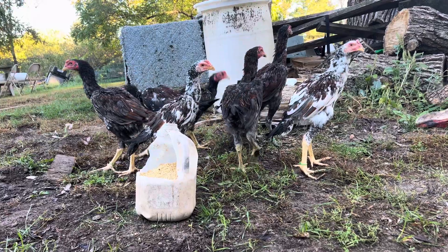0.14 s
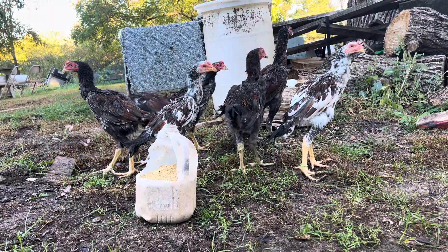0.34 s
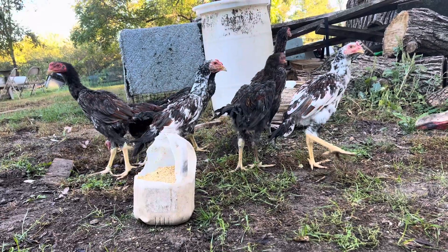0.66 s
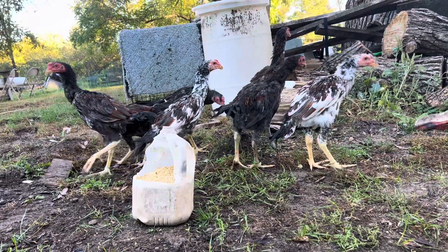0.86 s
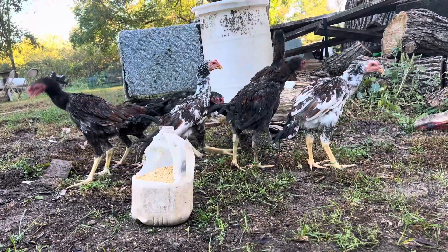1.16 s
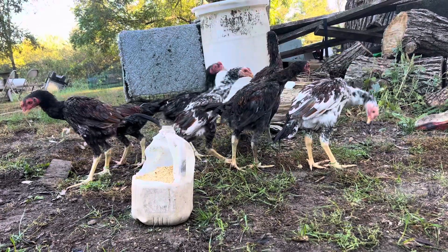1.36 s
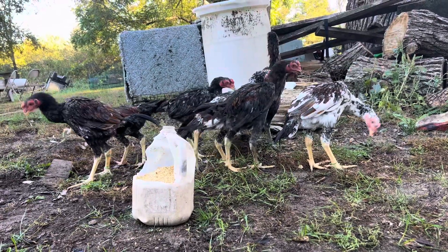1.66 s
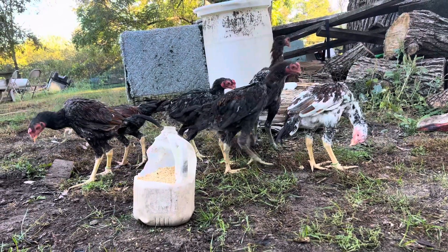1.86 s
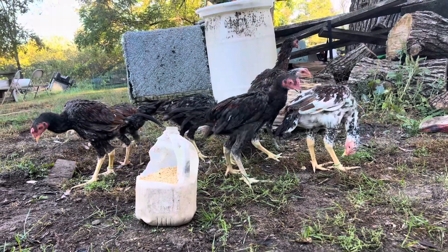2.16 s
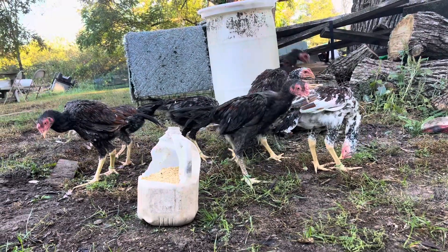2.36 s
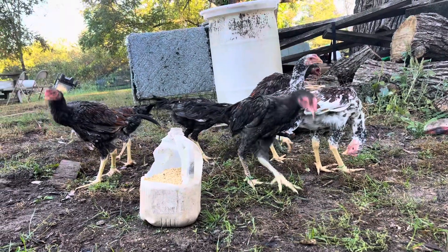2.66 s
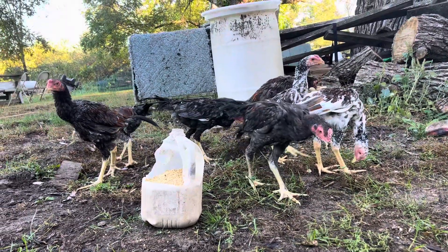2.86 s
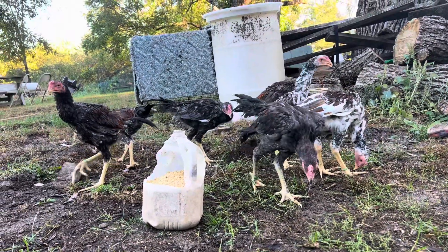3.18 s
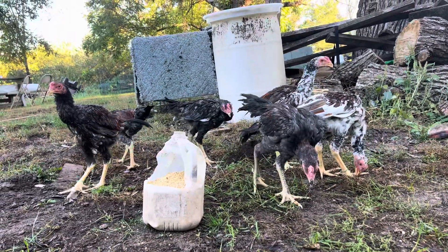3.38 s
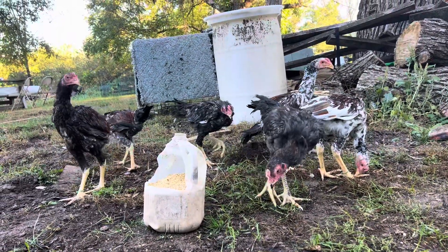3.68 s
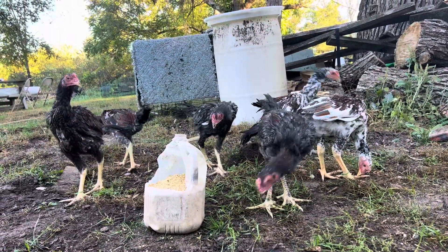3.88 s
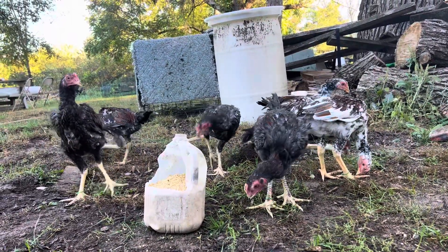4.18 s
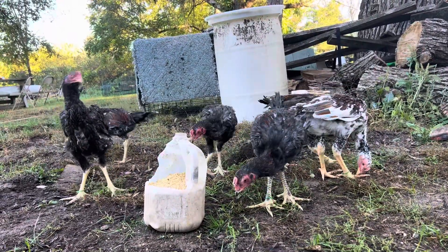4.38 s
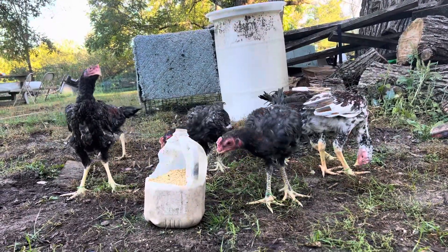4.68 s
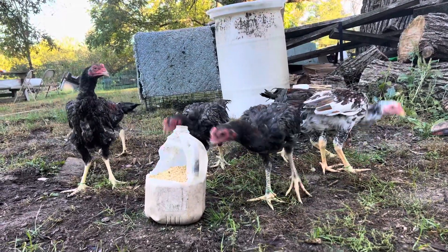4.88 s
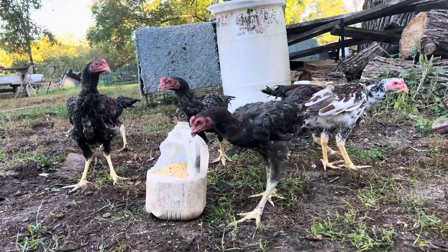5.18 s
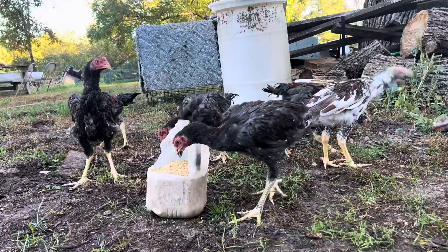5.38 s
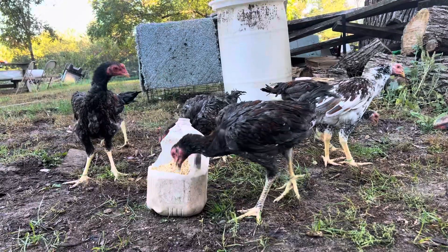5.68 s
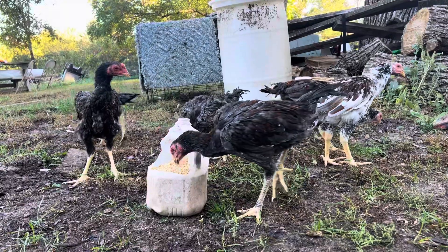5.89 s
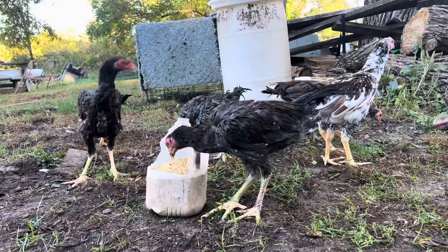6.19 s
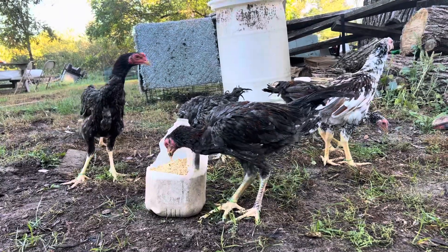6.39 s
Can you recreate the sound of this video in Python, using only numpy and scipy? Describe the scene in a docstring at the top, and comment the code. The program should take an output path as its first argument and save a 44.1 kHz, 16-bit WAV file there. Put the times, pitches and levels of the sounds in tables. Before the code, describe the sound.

Outdoor yard with a low, distant propeller drone and soft rustling air. A few quiet low clucks and a sagging moan come first, then two firmer clucks and a hoarse, cracking two-part crow from the right, by far the loudest sound. Afterwards small yelps, falling peeps, a faint songbird trill and light foot and beak ticks. Stereo microphone close to the birds.

```python
"""A rooster off to the right crows hoarsely: two beating membranes and hissing air drive a windpipe.
Before the crow it clucks twice; chickens cluck, moan and yelp as gliding stacks of partials, and peep as single tones.
Beaks, claws and brushed feathers are filtered noise bursts; a songbird trills in short rising whistles.
A far propeller engine drones past as sinking overtones, over a noise bed of rumble and rustling trees."""
import sys
import numpy as np
from scipy import signal
from scipy.fft import rfft, irfft
from scipy.io import wavfile
from scipy.ndimage import uniform_filter1d

SR = 44100
rng = np.random.default_rng(int(sys.argv[2]) if len(sys.argv) > 2 else 0)


def dump(signal):
    """Clip the signal to [-1, 1] and save it as 16-bit WAV at the path in sys.argv[1]."""
    limited = np.clip(np.atleast_2d(signal).T, -1, 1)
    pcm = np.round(limited * 32767).astype(np.int16)
    wavfile.write(sys.argv[1], SR, pcm)


N = 288414

# A far propeller engine passing over. Each row: time in seconds, turns per second in Hz, level in dB.
ENGINE_PASS = [(0, 33.8, -64.5), (.5, 33.61, -68), (2, 31.28, -56), (3.3, 29.29, -61), (5, 26.58, -63.5),
               (6.54, 24.58, -61)]
# What reaches the yard of its overtones. Each row: frequency in Hz, gain in dB.
DRONE_GAIN = [(55, -1), (90, 2.5), (112, 6), (140, -11), (185, -10.5), (220, -0.5), (300, -16)]
# Upper overtones, heard only at first. Each row: multiple of the turning rate, level in dB.
WHINE_TONES = [(9, -71), (11, -77), (14, -76.5), (18, -76)]
# How near the engine's rumble sounds. Each row: time in seconds, level in dB (only the changes count).
RUMBLE_NEARNESS = [(0, -66), (0.799, -57.5), (2.203, -56), (5.502, -54.5), (6.54, -55.5)]
# Colour of the air. Each row: frequency in Hz, relative level per Hz in dB.
AIR_COLOUR = [(25, -29.5), (65, 9.5), (109, -4), (176, -8), (237, -16.5), (354, -20), (978, -22.5),
              (2020, -36.5), (3260, -36.5), (4380, -48.5), (6200, -43.5), (9020, -49.5), (10300, -79.5),
              (15000, -66)]
# Likeness of the air's two sides. Each row: frequency in Hz, correlation from -1 to 1.
AIR_LIKENESS = [(60, 1), (180, 0.6), (550, -0.17), (1650, -0.36), (4970, -0.21), (15000, 0.45)]
# Balance of the air's two sides. Each row: frequency in Hz, left over right in dB.
AIR_LEAN = [(60, 0), (180, -8), (550, -2), (1650, -1.5), (4970, 4.5), (15000, -14)]
# The songbird's rising notes. Each row: start in seconds, length in seconds,
# top pitch in Hz before WHISTLE_RATIO, level in dB.
TRILL_NOTES = [(0, 0.044, 6870, -67), (0.105, 0.05, 6360, -71), (0.167, 0.027, 6360, -72),
               (3.288, 0.049, 7840, -63.5), (3.379, 0.037, 7270, -62), (3.478, 0.054, 6980, -66.5),
               (3.579, 0.032, 6320, -59.5), (3.673, 0.024, 6124, -56.5), (3.76, 0.037, 6070, -62),
               (3.859, 0.028, 6010, -67), (3.93, 0.024, 5920, -68.5)]
# The songbird's thin high calls. Each row: start in seconds, length in seconds,
# start and end pitch in Hz before WHISTLE_RATIO, level in dB.
HIGH_CALLS = [(2.875, 0.045, 6020, 7900, -73), (5.56, 0.045, 8785, 7390, -71)]
# Beaks and claws on dry ground. Each row: start in seconds, click level in dB, click centre in Hz, thud level in dB.
STEP_TICKS = [(0.894, -68, 5600, -46), (0.981, -55, 5170, -50), (1.088, -72, 5200, -47.5),
              (1.604, -61.5, 6400, -46), (1.653, -65, 11200, -60), (4.2925, -69, 8950, -49),
              (4.5108, -66, 2300, -42), (4.854, -68, 8200, -44), (4.9264, -57, 9000, -42),
              (5.97, -57.5, 5040, -41), (6.3095, -73, 4100, -39)]
# Feathers and grass brushed. Each row: start in seconds, length in seconds, centre in Hz, level in dB.
BRUSHES = [(0, 0.072, 4660, -60.5), (0.623, 0.18, 5660, -68), (0.787, 0.19, 5200, -70.5),
           (1.065, 0.044, 4970, -65), (1.541, 0.4, 6400, -67.5), (3.172, 0.12, 2540, -70),
           (4.435, 0.08, 3060, -69), (5.237, 0.13, 5800, -71), (6.032, 0.078, 6700, -70.5)]
# The clearest falling peeps. Each row: start in seconds, length in seconds,
# start and end pitch in Hz before WHISTLE_RATIO, mid-note level in dB.
CLEAR_PEEPS = [(.282, 0.086, 3700, 2400, -68), (.82, 0.056, 3680, 2870, -68), (.97, 0.083, 3490, 2790, -73),
               (1.49, 0.13, 3800, 3080, -69.5), (3.15, 0.23, 3570, 2888, -69),
               (3.331, 0.09, 3380, 3000, -68), (3.32, 0.117, 2530, 2410, -74),
               (3.421, 0.098, 3700, 2210, -67), (3.51, 0.064, 3460, 3000, -66.5),
               (3.81, 0.14, 3810, 3310, -70.5), (3.85, 0.13, 3240, 3110, -71.5),
               (4.065, 0.092, 3740, 3680, -69.5), (4.155, 0.076, 3650, 2790, -74),
               (4.2, .045, 3050, 2720, -71), (4.32, .11, 3860, 2196, -70), (4.52, 0.053, 3550, 3220, -71.5),
               (4.602, 0.11, 3735, 2350, -65.5), (4.66, 0.04, 2800, 2297, -60),
               (4.715, 0.024, 2840, 2650, -75), (4.37, .05, 2450, 2300, -71), (4.4, 0.063, 3400, 3100, -73),
               (4.805, 0.056, 3110, 2280, -63.5), (4.92, 0.14, 3396, 2146, -61),
               (5.119, 0.034, 2850, 2270, -65), (5.16, 0.15, 3590, 3060, -65.5),
               (5.18, 0.077, 3495, 2100, -61.5), (5.345, 0.019, 2140, 1780, -60.5),
               (5.38, 0.12, 3680, 3000, -66), (5.62, 0.076, 3700, 3010, -62.5),
               (5.77, 0.091, 3760, 3150, -71.5), (5.98, 0.054, 2790, 2240, -65.5),
               (5.9, 0.055, 3470, 3060, -67.5), (5.79, 0.078, 2800, 2680, -73),
               (6.075, 0.18, 3980, 2130, -66.5), (6.13, 0.086, 2850, 2570, -63),
               (6.105, 0.13, 3550, 2240, -66.5), (6.29, 0.05, 3640, 3170, -79),
               (6.392, 0.094, 3940, 3100, -68.5)]
# Clucks of each bird. Each row: start in seconds, level in dB, mid pitch in Hz, length in seconds,
# left lag in samples.
CLUCK_NOTES = {"low": [(.3385, -46, 271, 0.022, 29), (.485, -56, 267, 0.025, 25),
               (.6305, -45, 273, 0.022, 22.6), (.7725, -52.5, 287, 0.029, 22)],
               "rooster": [(1.2885, -38.5, 566, 0.038, 26), (1.4535, -39, 565, 0.033, 25.5)],
               "soft": [(4.4805, -38.5, 535, 0.019, 4.8), (4.5085, -54, 425, 0.015, 21),
               (6.1305, -46, 654, 0.02, 26.7), (6.1485, -41, 439.4, 0.0049, 15),
               (6.1935, -38, 495, 0.024, 25), (6.3535, -38.5, 501, 0.02, 22)]}
# Overtones of each clucking bird. Each row: multiple of the pitch, relative level in dB.
CLUCK_TONES = {"rooster": [(1, 0), (2, -26), (3, -18), (4, -17), (5, -38), (6, -36), (7, -25), (8, -28.5)],
               "low": [(1, 3), (2, 3), (3, 2.5), (4, -8), (5, -21), (9, -20), (10, -11)], "soft": [(1, -2),
               (2, -18), (3, -43)]}
# Overtones of the moan. Each row: multiple of the pitch, relative level in dB.
MOAN_OVERTONES = [(1, -7.5), (2, -3), (3, -2.5)]
# The crow, one table a syllable. Each row: time in seconds, effort in dB, pitch in Hz, roughness from 0 to 1,
# level of the lower membrane against the upper in dB, lift of everything above 1200 Hz in dB.
CROW_SYLLABLES = [
    [(1.685, -48, 673, 0.36, 10, 7), (1.692, -28.5, 683.7, 0.31, 14.5, 0),
     (1.729, -25, 695.4, 0.23, 11.5, 2.5), (1.74, -22, 706.3, 0.82, 7.5, 5.5),
     (1.835, -21, 705, 0.53, 11, 2), (1.855, -36, 684, 0.45, 14.5, 14.5), (1.88, -37, 742, 0.6, -2.5, -1)],
    [(1.966, -67, 749.3, 0.7, 2, 0), (1.972, -28.5, 748, 0.6, 2.5, -8), (1.992, -19.5, 765, 0.55, -2, 3),
     (2.014, -21, 787.1, 0, -26, -2), (2.07, -20.5, 800.5, 0.05, -28, 9), (2.09, -26.5, 762.7, 0.2, -10, 8),
     (2.125, -32, 765, 0.55, -25.5, 3), (2.165, -21.5, 775.5, 0.47, -12.5, 0.5),
     (2.3, -23.5, 780.4, 0.49, -8, 3), (2.49, -33.5, 736, 0.6, 8, 14.5), (2.55, -24.5, 711.8, 0.6, 0.5, 2),
     (2.65, -25, 694.5, 0.35, -1.5, 8.5), (2.68, -24.5, 698.5, 0.01, -26.5, 3.5),
     (2.77, -24, 671.7, 0.01, -52, 7), (2.795, -21.5, 602.5, 0.08, -42, -7.5),
     (2.815, -60, 560, 0.08, -29, -16)],
]
# Multiples of the crow's pitch that stay faint.
WEAK_PARTIALS = (5, 7, 10, 11)
# Windpipe resonances. Each row: centre in Hz, width in Hz, gain in dB.
WINDPIPE_PEAKS = [(599.6, 75, 2.5), (802, 210, -8), (954, 138, 4), (1440, 136, -3), (2100, 192, -5),
                  (3000, 297, 0.5), (3740, 114, -11), (5050, 710, -15), (6200, 1870, -17),
                  (8080, 240, -25.5), (8920, 470, -28), (12270, 1480, -30), (15100, 900, -46.5)]
# Dark bands between the resonances. Each row: centre in Hz, half width in Hz, depth from 0 to 1.
DARK_BANDS = [(1702, 30, 1.0), (3360, 45, 0.6), (4530, 200, 1.0),
              (5200, 500, 0.72), (10020, 1290, 1.0), (13900, 2400, 0.75)]
# The crow's balance at the two sides. Each row: frequency in Hz, left over right in dB.
CROW_SHADOW = [(60, 13), (110, -17.5), (200, -16.5), (380, -4), (700, -1), (1290, 1.5), (2380, -10.5),
               (4400, 2), (8120, -0.5), (15000, 1)]
# Yelps of a near bird. Each row: start in seconds, length in seconds, top pitch in Hz,
# sag by the end in Hz, level in dB.
YELP_NOTES = [(2.969, 0.058, 1568, 39, -47.5), (3.213, 0.054, 1507, 8.8, -42.5),
              (4.665, 0.06, 1435, 460, -63.5), (4.717, 0.034, 1520, 36, -63),
              (4.826, 0.051, 1224, 220, -60.5), (5.003, 0.063, 1386, 200, -63),
              (5.76, 0.046, 1474, 30, -67.5), (5.943, 0.036, 1364, 143, -58),
              (6.143, 0.046, 1543, 47, -54.5), (6.294, 0.048, 1645, 140, -47),
              (6.464, 0.051, 1643, 87, -46)]
# Decay of the yard's echoes. Each row: frequency in Hz, relative t60 (each source scales it to seconds).
YARD_DECAY = [(500, 0.31), (1300, 0.78), (2000, 1), (3000, 0.53), (5400, 1), (8000, 0.96)]

WHINE_FADE_S = 0.6
WHISTLE_RATIO = 0.97  # every whistle sounds this far below its written pitch
TRILL_START_HZ = 4300  # before WHISTLE_RATIO
CLICK_T60_S, THUD_T60_S = .014, .026
FLOCK_DB = -70.5  # the shallowest peeps of the birds further off
BODY_DB, BODY_T60_S = -1, 0.051  # the dull thump of the chest, against its cluck
MOAN_S, MOAN_END_S, MOAN_DB, MOAN_FADE_DB = 0.97, 1.5, -53, -5.5
MOAN_HZ, MOAN_SAG_HZ_PER_S = 303, 110
LOWER_RATIO, SCOOP, SCOOP_S = .825, 0.17, .025  # the lower membrane's pitch against the upper; it starts flat
WEAK_DB, EIGHTH_DB = -7, 8.5  # the faint partials, and the eighth, which rings out
JOLTS_PER_S, JOLT_DEPTH = 42, .4  # typical rate, which wanders; greatest depth as a share
RASP_DB = 7  # rms swing of a fully rough voice's bands at 4 kHz
RAISE, LOW_HZ, HIGH_HZ = 1.0325, 705, 795  # lower resonances climb by RAISE as the pitch goes from LOW to HIGH
CROW_LAG = 22  # samples by which left lags
YELP_SCOOP, YELP_RISE_S = 0.116, 0.0093  # share of the pitch leapt, and the time it takes
LEAD_S, LEAD_RATIO, LEAD_DB = 0.012, .87, -11.5  # a husky lower note, before its noise and swell, leads each yelp
EDGE_HZ = 16400


def amp(db):
    """Decibels to gain."""
    return 10 ** (np.asarray(db) / 20)


def evened(x):
    """Scales to unit rms."""
    return x / np.sqrt(np.mean(x ** 2) + 1e-20)


def read(points, hz):
    """Looks a table up on a log-frequency axis."""
    f, value = np.transpose(points)
    return np.interp(np.log(hz + 1), np.log(f + 1), value)


def curves(rows):
    """Joins the rows of a table by straight lines, sample by sample."""
    s, *columns = np.transpose(rows)
    t = np.arange(s[0], s[-1], 1 / SR)
    return [t] + [np.interp(t, s, c) for c in columns]


def wander(size, hz):
    """Noise of unit rms, low-passed at hz so that it drifts no faster."""
    b, a = signal.butter(2, hz / SR * 2)
    return evened(signal.lfilter(b, a, rng.standard_normal(size + 2000))[2000:])


def bandpass(order, low_hz, high_hz, x):
    """Keeps one band of a sound."""
    return signal.lfilter(*signal.butter(order, [low_hz, high_hz], "band", fs=SR), x)


def add(mix, s, sound, lag=0):
    """Places a sound that reaches the left microphone lag samples after the right one."""
    for channel, late in zip(mix, (lag / 2, -lag / 2)):
        part = channel[max(round(s * SR + late), 0):][:len(sound)]
        part += sound[:len(part)]


def stack(hz, tones):
    """Partials that ride on one pitch curve, silent above half the sample rate."""
    turn = 2 * np.pi * np.cumsum(hz) / SR
    return sum(amp(db) * np.sin(k * turn) * (k * hz < SR / 2) for k, db in tones)


def engine():
    """Steady overtones of the propeller, each wavering slowly in strength."""
    t, hz, db = curves(ENGINE_PASS)
    drone = 0
    for k in range(2, 11):
        level_db = db + read(DRONE_GAIN, k * hz) + 3.2 * wander(len(t), 2.8)
        drone = drone + stack(hz, [(k, level_db)])
    whine = stack(hz, WHINE_TONES) * np.clip(1 - (t / WHINE_FADE_S) ** 4, 0, 1)
    out = np.zeros((2, N))
    add(out, 0, drone + whine, lag=14.)
    return out


def air():
    """Patchy noise: the rumble follows the engine's nearness, the hiss of the trees only a little."""
    frames, hz = N // 256 + 5, np.fft.rfftfreq(1024, 1 / SR)
    a, b, c, d, patches = rng.standard_normal((frames, 513, 5)).T
    patches = evened(uniform_filter1d(uniform_filter1d(patches, 10, 0), 14, 1))
    patch_db = np.interp(hz, [150, 500, 5000], [.8, 2.4, 3.])[:, None] * patches

    s, db = np.transpose(RUMBLE_NEARNESS)
    near_db = np.interp(np.arange(frames) * 256 / SR, s, db) - db.max()
    share = np.interp(hz, [170, 400, 2000], [1, .45, .15])[:, None]
    level_db = read(AIR_COLOUR, hz)[:, None] + share * near_db + patch_db

    # The right side blends the left noise with noise of its own.
    same = np.clip(read(AIR_LIKENESS, hz), -1, 1)[:, None]
    left = a + 1j * b
    right = same * left + np.sqrt(1 - same ** 2) * (c + 1j * d)
    lean = read(AIR_LEAN, hz)[:, None] / 2
    z = np.array([left, right]) * amp([lean, -lean]) * amp(level_db)
    return amp(-53.5) * evened(signal.istft(z, nperseg=1024, noverlap=768)[1][:, :N])


def whistles(rows, waver, bend, husk, fade, lags=0, swell_db=0):
    """Single gliding tones that flutter in strength and may swell; fast noise breaks up the husky ones."""
    out = np.zeros((2, N))
    for (s, length, hz, end_hz, db), lag in zip(rows, lags + np.zeros(len(rows))):
        u = np.linspace(0, 1, round(length * SR))
        pitch = (hz + (end_hz - hz) * u ** bend) * (1 + waver * wander(len(u), 90))
        tone = stack(pitch, [(WHISTLE_RATIO, db + swell_db * (u - .5))])
        flutter = amp(2.87 * wander(len(u), 62))
        breath = 1 - husk + husk * wander(len(u), 800)
        add(out, s, tone * flutter * breath * signal.windows.tukey(len(u), fade), lag)
    return out


def songbird():
    """A husky trill of rising notes, and two thin high calls, one rising and one falling."""
    notes = [(s, length, TRILL_START_HZ, top_hz, db) for s, length, top_hz, db in TRILL_NOTES]
    trill = whistles(notes, waver=.02, bend=.5, husk=.45, fade=.55)
    return trill + whistles(HIGH_CALLS, waver=0.0056, bend=.6, husk=0, fade=0.13)


def steps():
    """Ticks pair a click burst with a dull thud; rustles are swells of crackly band noise."""
    out = np.zeros((2, N))
    for s, db, hz, thud_db in STEP_TICKS:
        t = np.arange(500) / SR
        blow = rng.standard_normal((2, len(t))) + 6.4 * (t == 0)  # a sharp first contact, then grit
        click = amp(db - 60 * t / CLICK_T60_S) * bandpass(1, hz * .7, hz * 1.4, blow[0])
        thud = amp(thud_db - 60 * t / THUD_T60_S) * bandpass(2, 330, 1250, blow[1])
        add(out, s, click + thud)
    for s, length, hz, db in BRUSHES:
        size, start = round(length * SR), round(s * SR)
        grains = rng.standard_normal((2, size)) * amp(3.4 * wander(size, 400))
        brush = amp(db) * evened(bandpass(2, hz / 1.19, hz * 1.255, grains)) * np.hanning(size)
        out[:, start:start + size] += brush[:, :N - start]
    return out


def flock():
    """Clear peeps over birds further off that peep at random; the deeper their fall, the fainter."""
    s, top, fall, length, side = rng.random((240, 5)).T
    start_hz = 3100 + 1000 * top
    end_hz = 2800 + 900 * top - 1050 * fall
    rows = np.transpose([s * N / SR, .06 + .09 * length, start_hz, end_hz, FLOCK_DB - 8 * fall])
    clear = whistles(CLEAR_PEEPS, waver=.011, bend=1.8, husk=.25, fade=.4, swell_db=6)
    return clear + whistles(rows, waver=.016, bend=1.7, husk=.3, fade=.6, lags=40 * side - 20)


def clucks():
    """Short notes of arching pitch with a puff of air, over a decaying noise thump of the chest."""
    out = np.zeros((2, N))
    for bird, rows in CLUCK_NOTES.items():
        for s, db, hz, length, lag in rows:
            u = np.linspace(-1, 1, round(length * SR))
            arch = hz * (1 - 0.052 * u ** 2 - 0.031 * u)
            note = evened(stack(arch, CLUCK_TONES[bird])) + 0.049 * wander(len(u), 2700)
            add(out, s, amp(db) * note * signal.windows.tukey(len(u), .7), lag)
            t = np.arange(0, BODY_T60_S, 1 / SR)
            body = evened(bandpass(2, hz * 0.84, hz * 1.28, rng.standard_normal(len(t))))
            add(out, s, amp(db + BODY_DB - 60 * t / BODY_T60_S) * body, lag)
    return out


def moan():
    """A drawn-out chicken note of three partials that sags in pitch and quavers in strength."""
    out = np.zeros((2, N))
    t = np.arange(0, MOAN_END_S - MOAN_S, 1 / SR)
    level_db = MOAN_DB + MOAN_FADE_DB * t / t[-1] + 4.3 * wander(len(t), 38)
    note = stack(MOAN_HZ - MOAN_SAG_HZ_PER_S * t, MOAN_OVERTONES) * amp(level_db)
    add(out, MOAN_S, note * signal.windows.tukey(len(t), .15), lag=25.8)
    return out


def windpipe(hz):
    """Gain of the windpipe: resonances, the top ones steep-sided, with dark bands between."""
    pipe = 0
    for f, width, db in WINDPIPE_PEAKS:
        steepness = 2 + 2 * (f > SR / 4)
        pipe = pipe + amp(db) / (1 + ((hz - f) / width * 2) ** steepness)
    # the valleys are not empty
    pipe = pipe + amp(-30.0) * (hz / 500) ** 2 / (1 + (hz / 500) ** 2) / (1 + (hz / 4200) ** 6)
    for dark_hz, width, depth in DARK_BANDS:
        pipe = pipe * (1 - depth / (1 + ((hz - dark_hz) / width) ** 2))
    return pipe


def membranes(t, upper, rough, lower_db):
    """Two membranes beat against each other; roughness makes them falter, jolt and let air hiss through."""
    size = len(t)
    shake = 1 + 0.0388 * rough * wander(size, 82.5)
    upper_hz = upper * shake
    lower_hz = upper_hz * LOWER_RATIO * (1 - SCOOP * np.exp((t[0] - t) / SCOOP_S))
    tones = [(k, -3. * np.log2(k) + EIGHTH_DB * (k == 8) + WEAK_DB * (k in WEAK_PARTIALS)) for k in range(1, 24)]
    lower_tones = [(k, -5. * np.log2(k) - 5.8 * (k % 3 == 0)) for k in range(1, 9)]
    high_swing = evened(stack(upper_hz, tones[:2]))
    low_swing = evened(stack(lower_hz, lower_tones))
    top = stack(upper_hz, tones[2:])

    # each swing passes through zero when very rough
    falter = [1 - 1.3 * rough + .9 * rough * wander(size, 95) for _ in range(3)]
    # the upper partials break up on their own
    top_break = falter[2] * (1 - rough) + 0.53 * rough * wander(size, 390)
    # air escapes at each opening
    puffs = .4 + 2 * np.exp(-(np.cumsum(upper_hz) / SR % 1) * 4)
    hiss = 1.41 * rough * rng.standard_normal(size) * puffs
    drive = high_swing * falter[0] + amp(lower_db) * low_swing * falter[1] + 0.5 * top * top_break + hiss

    # a rough voice catches and lets go in uneven jolts
    jolts = np.exp(-2 * (np.cumsum(JOLTS_PER_S * amp(5 * wander(size, 30))) / SR % 1))
    return drive * (1 + JOLT_DEPTH * np.minimum(2 * rough, 1) * (2 * jolts - 1))


def rasp(voice, t, rough):
    """Each band of a rough voice swells and chokes on its own, more so in the treble."""
    f, s, z = signal.stft(voice, SR, nperseg=512, noverlap=384)
    patches = uniform_filter1d(rng.standard_normal(z.shape), size=3, axis=0)
    patches = evened(uniform_filter1d(patches, size=17, axis=1))
    treble = np.clip(f / 4000, .3, 1.3)[:, None]
    z = z * amp(RASP_DB * np.interp(s, t - t[0], rough) * treble * patches)
    return signal.istft(z, SR, nperseg=512, noverlap=384)[1][:len(t)]


def syllable(rows):
    """The membranes sound through a windpipe whose lower resonances climb with the pitch."""
    t, effort_db, upper, rough, lower_db, bright_db = curves(rows)
    rough = np.clip(rough, 0, 1)
    spectrum = rfft(membranes(t, upper, rough, lower_db))
    hz = np.fft.rfftfreq(len(t), 1 / SR)
    slack = irfft(spectrum * windpipe(hz), len(t))
    tense = irfft(spectrum * windpipe(np.where(hz < 4000, hz / RAISE, hz)), len(t))
    voice = slack + (tense - slack) * np.clip((upper - LOW_HZ) / (HIGH_HZ - LOW_HZ), 0, 1)
    high = irfft(rfft(voice) * (hz > 1200), len(t))
    voice = rasp(voice + high * (amp(bright_db) - 1), t, rough)
    # the effort alone sets the slow level
    level = np.sqrt(uniform_filter1d(voice ** 2, size=2600) + 1e-12)
    return amp(effort_db) * voice / level * signal.windows.tukey(len(t), 0.002 / (t[-1] - t[0]))


def rooster():
    """The crow reaches the right first; the microphone housing shades some bands of the left side."""
    crow = np.zeros((2, N))
    for rows in CROW_SYLLABLES:
        add(crow, rows[0][0], syllable(rows), lag=CROW_LAG)
    lean = read(CROW_SHADOW, np.fft.rfftfreq(N, 1 / SR)) / 2
    return irfft(rfft(crow) * amp([lean, -lean]), N)


def yelps():
    """Near-pure notes from a close bird: a husky lead-in, a leap up, a swell, a sag."""
    out = np.zeros((2, N))
    for s, length, top_hz, sag_hz, db in YELP_NOTES:
        t = np.arange(0, length, 1 / SR)
        hz = top_hz * (1 - YELP_SCOOP * np.exp(-(t / YELP_RISE_S) ** 2)) - sag_hz * t / length
        swell = np.sin(np.pi * (t / length) ** 2.0) ** 0.36
        add(out, s, stack(hz, [(1, db), (2, db - 17.5)]) * swell, lag=4.5)
        lead_hz = top_hz * LEAD_RATIO * (1 + 0.0066 * wander(len(t), 90))
        lead = stack(lead_hz, [(1, db + LEAD_DB), (2, db + LEAD_DB - 6.0)])
        husk = 0.56 + 0.24 * wander(len(t), 300)
        add(out, s - LEAD_S, lead * husk * np.hanning(len(t)), lag=4.5)
    return out


def yard(x, seconds_scale):
    """Sparse echoes of random sign from sheds and trees, each band dying at its own speed."""
    taps = np.zeros((2, SR))
    at = np.arange(700, SR - 20, 20) + rng.integers(0, 20, (2, (SR - 701) // 20))
    np.put_along_axis(taps, at, rng.choice([-1., 1.], at.shape), 1)
    hz, t, z = signal.stft(taps, SR, nperseg=256)
    t60 = seconds_scale * read(YARD_DECAY, hz)[:, None]
    tail = signal.istft(z * amp(-60 * t / t60), SR, nperseg=256)[1]
    return signal.fftconvolve(x, tail / np.linalg.norm(tail[0]), axes=1)[:, :N]


def scene():
    """Each source with its share of yard echo: little on the near birds, much on the songbird and flock."""
    trees, peeps = songbird(), flock()
    ground = clucks() + moan() + steps()
    crow, near = rooster(), yelps()
    mix = air() + engine()
    mix += trees + amp(8.0) * yard(trees, 0.33)
    mix += peeps + amp(-3.0) * yard(peeps, 0.3)
    mix += ground + amp(-14.0) * yard(ground, 0.39)
    mix += crow + amp(-9.0) * yard(crow, 0.62)
    mix += near + amp(-21.0) * yard(near, .4)
    return mix


def record(dry):
    """The microphones lose the deepest bass; then a steep low-pass takes all above EDGE_HZ."""
    thin = signal.sosfilt(signal.butter(4, 42., "high", fs=SR, output="sos"), dry)
    low_pass = signal.firwin(511, EDGE_HZ, window=("kaiser", 9), fs=SR)
    return signal.oaconvolve(thin, low_pass[None], "same")


dry = scene()
out = record(dry)
dump(out)
```